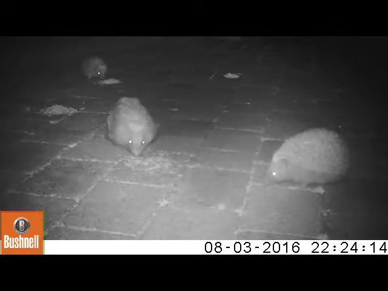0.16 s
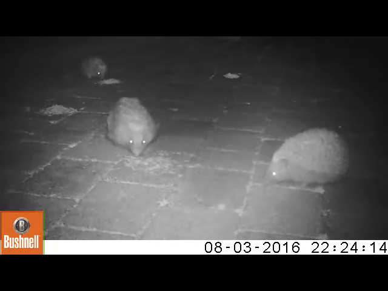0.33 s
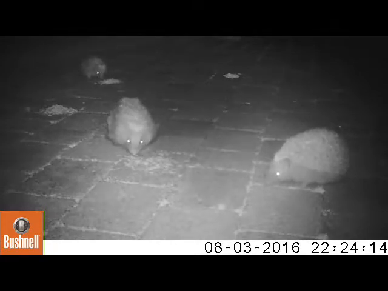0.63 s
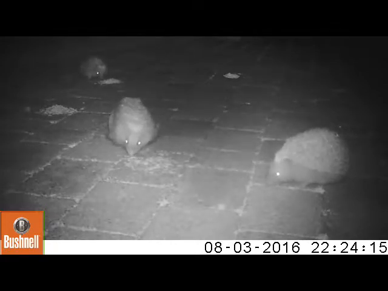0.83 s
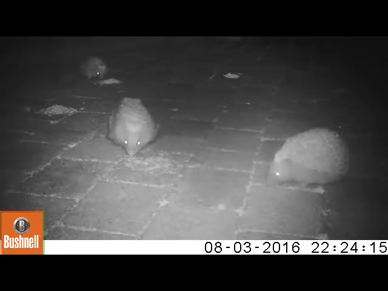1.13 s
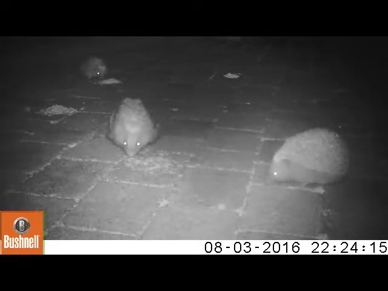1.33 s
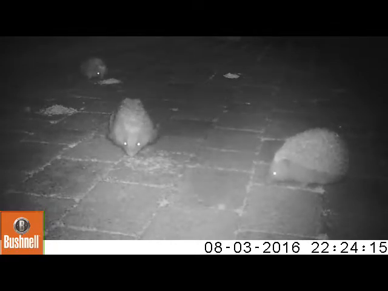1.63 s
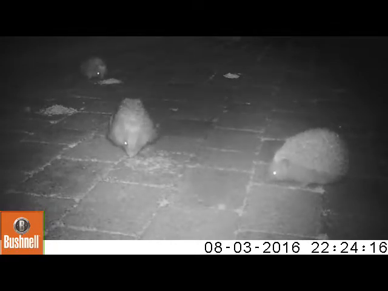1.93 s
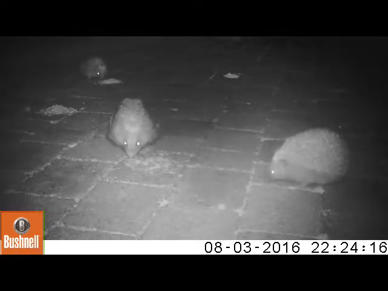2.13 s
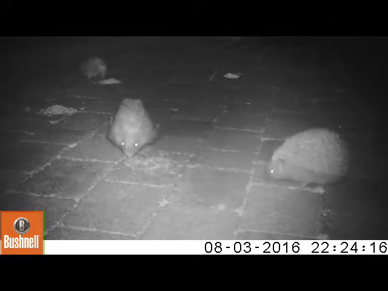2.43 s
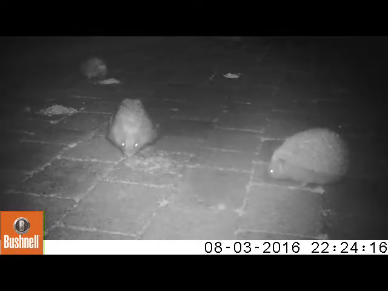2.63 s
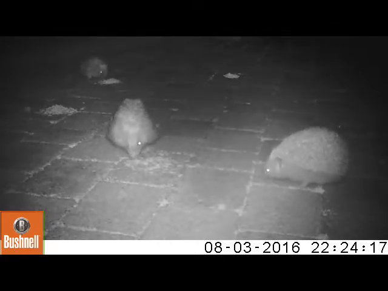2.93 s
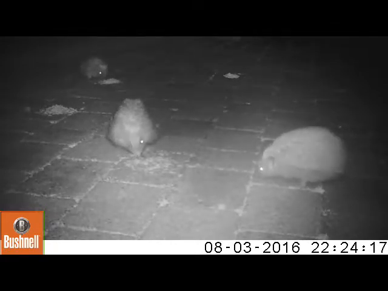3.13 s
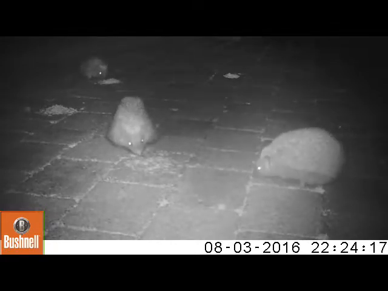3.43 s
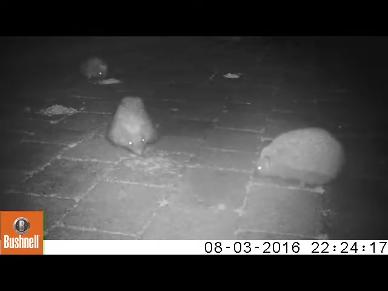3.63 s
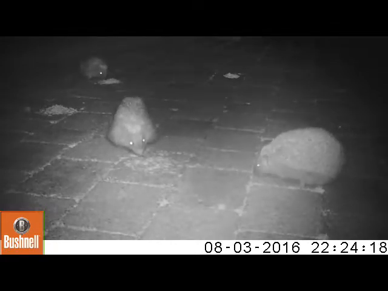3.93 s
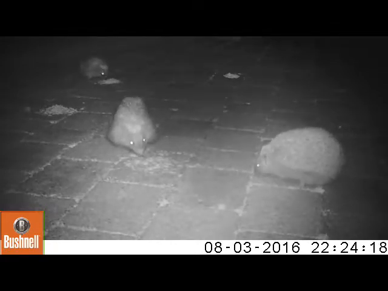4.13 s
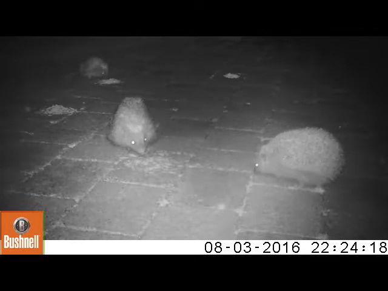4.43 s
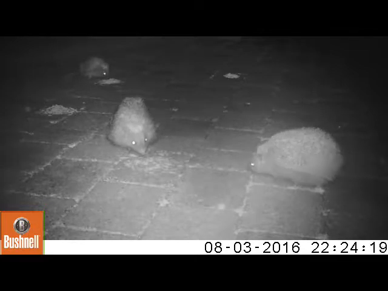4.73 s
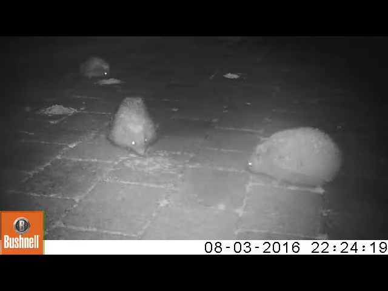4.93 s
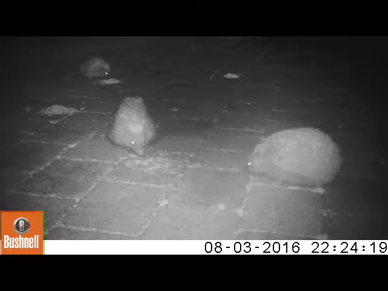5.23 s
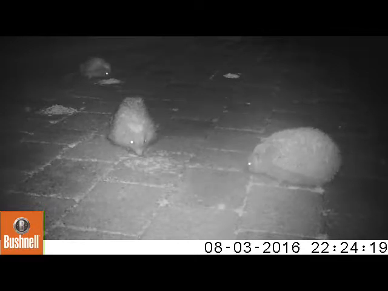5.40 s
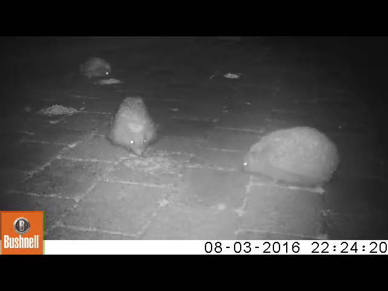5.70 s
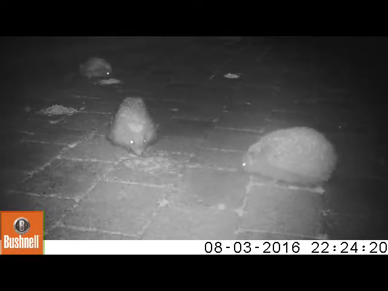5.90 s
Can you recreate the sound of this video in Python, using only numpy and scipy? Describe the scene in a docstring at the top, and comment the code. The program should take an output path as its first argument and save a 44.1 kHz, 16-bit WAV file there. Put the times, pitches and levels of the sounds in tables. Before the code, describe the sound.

Quick crisp crunching of hard dry food by small animals outdoors, with low wind buffeting the microphone and a steady dull rumble.

```python
"""Hedgehogs crunching dry pellets

At night, hedgehogs crunch dry pellets on paving near a boxed outdoor camera.
Brittle fracture: each bite is a shower of tiny breaks with some loud cracks, and these impulsive forces
excite a dull and a bright group of resonances. The paving and nearby walls add a short smear.
Turbulence: light wind buffets the microphone port, as filtered noise and single pressure dips.
A steady rumble and hiss, made as noise of a given spectrum, lies underneath."""
import sys
import numpy as np
from scipy import signal
from scipy.fft import rfft, irfft, next_fast_len
from scipy.io import wavfile
from scipy.ndimage import uniform_filter1d

SR = 44100
rng = np.random.default_rng(int(sys.argv[2]) if len(sys.argv) > 2 else 0)


def bounce(signal):
    """Save signal as a 16-bit WAV file at the path given by the first command-line argument."""
    frames = np.transpose(np.atleast_2d(signal))
    limited = np.clip(frames, -1, 1)
    pcm = np.round(limited * 32767).astype(np.int16)
    wavfile.write(sys.argv[1], SR, pcm)


N = 267246
T = np.arange(N) / SR  # time in seconds


def undb(db):
    """Decibel law: 20 dB is a factor of ten in amplitude."""
    return 10 ** (np.asarray(db) / 20)


def level(x, db):
    """Normalisation: scales a signal to a given rms level in dB."""
    return x * undb(db) / np.sqrt(np.mean(x ** 2))


def random_signs(count):
    """Random polarity: each force pushes or pulls with equal chance."""
    return rng.choice([-1., 1.], count)


def coloured(spectrum):
    """Spectral shaping: white noise weighted by (Hz, relative dB) points, at rms 1."""
    hz, db = np.transpose(spectrum)
    size = next_fast_len(N)
    f = np.maximum(np.fft.rfftfreq(size, 1 / SR), 1)
    gain = undb(np.interp(np.log(f), np.log(hz), db))
    white = rng.standard_normal(size)
    return level(irfft(rfft(white) * gain, size)[:N], 0)


def walk(rate):
    """Slow random modulation: values held for 1 / rate s, smoothed by two moving averages, at rms 1."""
    hold = int(SR / rate)
    steps = np.repeat(rng.standard_normal(N // hold + 1), hold)
    smooth = uniform_filter1d(uniform_filter1d(steps, hold), hold)
    return level(smooth[:N], 0)


NIGHT_LEVEL_DB = -52
# Spectrum of the steady rumble and hiss.
# Each row: frequency in Hz, relative spectral level in dB.
NIGHT_SPECTRUM = [(12, -27), (20, -6), (46, -4), (1740, -41.5), (6100, -46), (10300, -51.5), (13400, -90.5),
                  (22000, -120)]


def night():
    """Stationary noise: a low rumble and hiss whose level wanders very slightly."""
    return coloured(NIGHT_SPECTRUM) * undb(NIGHT_LEVEL_DB + 0.087 * walk(3))


# The strongest eddies that suck at the port.
# Each row: time of the dip in seconds, peak level in dB, pitch in Hz.
EDDIES = [(0.015, -34, 65), (0.128, -33.5, 70), (0.154, -28.5, 86), (0.168, -30, 70), (0.296, -21, 61),
          (0.328, -27.5, 85), (0.396, -24.5, 68), (0.49, -31.5, 59.6), (2.103, -34, 61), (2.153, -31.5, 69),
          (2.247, -32, 55), (2.98, -31.5, 75.5), (3.033, -33.5, 112), (3.128, -31.5, 66),
          (3.275, -31, 56.4), (3.508, -27, 57), (3.926, -26.5, 59.5), (4.018, -26.5, 69), (4.083, -31, 69),
          (4.136, -32.5, 55.3)]


def thumps(cycles=0.4):
    """Suction of a vortex: each strong eddy is a dip in pressure between two small rebounds."""
    out = np.zeros(N)
    for s, db, hz in EDDIES:
        turns = (T - s) * hz
        out -= undb(db) * np.cos(2 * np.pi * turns) * np.exp(-(turns / cycles) ** 2)
    return out


GUST_RISE_S, GUST_FALL_S = 0.032, 0.058  # before and after the held part of a gust
# Gusts at the port.
# Each row: start of the held part in seconds, its length in seconds, level of the slow buffeting in dB,
# level of the quick flutter in dB, both before the random lumps; a level below the calm one has no effect.
GUST_TABLE = [(0.0, 0.079, -34, -78), (0.108, 0.12, -36, -45.5), (0.271, 0.14, -33, -40),
              (0.432, 0.1, -38, -47.5), (1.035, 0.17, -36, -71), (1.702, 0.27, -35, -53.5),
              (2.065, 0.34, -37.5, -49.5), (2.58, 0.15, -36, -51), (2.92, 0.33, -37.5, -48.5),
              (3.344, 0.32, -36.5, -54.5), (3.885, 0.327, -36, -49), (4.69, 0.12, -46.5, -58),
              (5.244, 0.12, -43.5, -66), (5.48, 0.24, -46.5, -54), (5.95, 0.15, -45, -59.5)]


def gusting(column, calm_db):
    """Envelope of unsteady flow: a gust louder than the calm level lifts it by a rise, a hold and a fall."""
    out = np.full(N, float(calm_db))
    for gust in GUST_TABLE:
        start_s, length_s = gust[:2]
        rise = (T - start_s) / GUST_RISE_S + 1
        fall = (start_s + length_s - T) / GUST_FALL_S + 1
        share = np.clip(np.minimum(rise, fall), 0, 1)
        # a quieter gust leaves the level unchanged
        out = np.maximum(out, calm_db + share * (gust[column] - calm_db))
    return out


def wind():
    """Turbulent pressure: slow buffeting, quicker flutter and rasp swell in the same lumps."""
    # the second argument is the level in dB between gusts
    buffet_db = gusting(2, -49.5)
    flutter_db = gusting(3, -67.5)
    buffet = coloured([(2, -22.5), (8, 8), (28, 0.5), (45, -19.0), (120, -42.5), (20000, -140)])
    flutter = coloured([(2, -57.5), (30, -18.5), (50, 4.5), (100, -11.5), (170, -14), (300, -35.5),
                        (20000, -140)])
    # the strongest gusts tear into finer eddies that reach higher
    rasp = coloured([(2, -61), (90, -14.5), (140, -4.0), (250, -7), (420, -25.5), (20000, -140)])
    rasp_db = 1.545 * flutter_db + 7.0
    swell = buffet * undb(buffet_db) + flutter * undb(flutter_db) + rasp * undb(rasp_db)
    lumps_db = 2.2 * walk(18)
    return swell * undb(lumps_db) + thumps()


def ring(x, hz, width_hz):
    """Resonance: the same band-pass twice in series gives one peak with steep skirts."""
    b, a = signal.iirpeak(hz, hz / width_hz, fs=SR)
    return signal.lfilter(b, a, signal.lfilter(b, a, x))


def fractures(rate, spread_db):
    """Random point process: breaks at a mean rate per second, most small and a few large, at rms 1."""
    breaks = rng.random(N) < rate / SR
    size = np.minimum(rng.exponential(1, N), 3.0)
    return level(breaks * undb(spread_db * size), 0)


def favour(hz, centre_hz, octaves):
    """Cavity tuning: the mouth's opening favours resonances near one centre."""
    return 0.13 + 0.69 * np.exp(-.5 * (np.log2(hz / centre_hz) / octaves) ** 2)


RISE_SHARE, EDGE_DB = 0.49, 12.5  # part of a bite spent building up; fall in level at its edges
# Jaw closings.
# Each row: time of greatest pressure in seconds, length in ms, relative levels of the dull and the bright
# crumbling in dB, centres favoured in the dull and the bright group in Hz.
JAW_CLOSINGS = [(0.093, 44, -51, -50.5, 3540, 6200), (0.176, 44, -50, -46, 4060, 6200),
                (0.293, 40, -40, -46, 3630, 5100), (0.418, 18, -62, -58.5, 3630, 4780),
                (0.47, 13, -55, -68, 3650, 5140), (0.539, 59, -48.5, -54.5, 3700, 5400),
                (0.645, 25, -58, -43, 4160, 5460), (0.676, 33, -58, -50, 4050, 6000),
                (0.733, 30, -62, -65, 3800, 5880), (0.812, 79, -54, -61, 3630, 5580),
                (0.93, 100, -69, -55.5, 3510, 5630), (1.097, 70, -57, -55.5, 3580, 5930),
                (1.135, 95, -58, -61, 3590, 5800), (1.237, 33, -74, -58, 3030, 5650),
                (1.339, 47, -49, -57, 3360, 5520), (1.435, 22, -57, -59, 3740, 4790),
                (1.556, 70, -51, -54, 3540, 6100), (1.592, 25, -60, -54, 3320, 6200),
                (1.767, 35, -50, -48, 3600, 6560), (1.802, 70, -48.5, -50.5, 3300, 6050),
                (1.98, 13, -50, -63, 3720, 4830), (2.021, 62, -47.5, -51.5, 3480, 5050),
                (2.149, 38, -64, -55, 3600, 5670), (2.252, 59, -51, -53.5, 3460, 5460),
                (2.486, 49, -61, -58, 3530, 6750), (2.753, 32, -53, -46, 3270, 5420),
                (2.78, 43, -53.5, -51, 3340, 6020), (3.014, 80, -46, -51, 3530, 6450),
                (3.125, 19, -62, -61, 3500, 5700), (3.238, 47, -44.5, -50.5, 3200, 6160),
                (3.265, 37, -51.5, -53, 2600, 6100), (3.368, 150, -58, -56.5, 3800, 6000),
                (3.518, 70, -49, -53, 3260, 6300), (3.558, 29, -58, -55, 2590, 6330),
                (3.772, 51, -50.5, -56.5, 3170, 6150), (3.951, 19, -70, -57, 3200, 5430),
                (4.043, 50, -53, -57, 3380, 6180), (4.237, 15, -52, -55.5, 3670, 5220),
                (4.305, 19, -70, -59, 4090, 5650), (4.355, 34, -64, -62, 3380, 5800),
                (4.638, 37, -62, -55.5, 3230, 6000), (4.845, 30, -60, -66, 3600, 5850),
                (4.908, 54, -54, -53.5, 3600, 5830), (4.941, 42, -56, -63, 3660, 5940),
                (5.113, 16, -57, -63, 3120, 5740), (5.268, 60, -56, -58.5, 3080, 6280),
                (5.528, 54, -56, -55, 3350, 6200), (5.719, 67, -56.5, -52, 3380, 5350),
                (5.816, 40, -53, -55, 3530, 6600)]


def pressure(db, centre_hz, hz, octaves):
    """Power summation: the jaw pressure of all bites, each building to a peak and letting go."""
    power = np.zeros(N)
    for k, (s, length_ms) in enumerate(np.array(JAW_CLOSINGS)[:, :2]):
        near = slice(max(int((s - .15) * SR), 0), int((s + .15) * SR))
        t = T[near] - s
        # distance from the peak: 1 at either edge of the bite
        past = 1000 * np.where(t < 0, -t / RISE_SHARE, t / (1 - RISE_SHARE)) / length_ms
        bite = undb(db[k] - EDGE_DB * past) * favour(hz, centre_hz[k], octaves)
        power[near] += bite ** 2
    return np.sqrt(power)


DEBRIS_MS = 4.4  # decay time constant of the crumbs that keep breaking off after each crack
# The loudest single pellets splitting.
# Each row: time in seconds, relative levels in the dull and the bright group in dB.
PELLET_CRACKS = [(0.0914, -42, -43), (0.1062, -49, -43), (0.163, -48, -42), (0.2816, -31, -34),
                 (0.296, -36, -39), (0.524, -37, -42), (0.5443, -41, -56), (0.637, -54, -32),
                 (0.6669, -58, -35), (0.7263, -34, -52), (0.8263, -43, -56), (0.9306, -62, -46),
                 (1.2312, -65, -44), (1.338, -34, -48), (1.556, -41, -40), (1.588, -33, -35),
                 (1.7547, -42, -41), (1.7652, -38, -42), (1.791, -38, -28.5), (1.811, -48, -44),
                 (1.9987, -40, -60), (2.007, -35, -33), (2.0213, -40, -50), (2.1507, -68, -45),
                 (2.25, -42, -51), (2.7226, -58, -38), (2.7485, -33, -33), (2.771, -48, -39),
                 (2.9736, -54, -36.5), (3.005, -38, -29.5), (3.017, -44, -33.5), (3.03, -39, -42),
                 (3.231, -35, -32), (3.2646, -57, -42), (3.5201, -40, -37), (3.556, -41, -43),
                 (3.776, -54, -38), (4.2353, -52, -52), (4.6401, -64, -39), (4.8447, -65, -40.5),
                 (4.9436, -48, -38), (5.2674, -43, -50), (5.5246, -58, -46), (5.712, -52, -43),
                 (5.808, -40, -33.5)]


def resound(modes, shower, splinters, column, octaves, splinter_db, debris_db, tear_ms):
    """Modal excitation: crumbling, splinters and cracks drive one group of resonances."""
    bite_s, bite_db, bite_hz = np.array(JAW_CLOSINGS)[:, [0, 2 + column, 4 + column]].T
    crack_s, crack_db = np.array(PELLET_CRACKS)[:, [0, 1 + column]].T
    # a crack takes the mouth shape of the nearest bite
    crack_hz = bite_hz[np.argmin(abs(crack_s[:, None] - bite_s), axis=1)]
    at = (crack_s * SR).astype(int)
    crack_sign = random_signs(len(at))
    debris_decay = np.exp(-1000 / (DEBRIS_MS * SR))
    out = 0
    for hz, width_hz, db in modes:
        # a crack is a short tearing push, not a single instant
        t = T[:200]
        tear = np.sin(2 * np.pi * hz * t) * np.exp(-1000 * t / tear_ms)
        # no two mouthfuls ring this resonance equally
        uneven_db = bite_db + 2.0 * rng.standard_normal(len(bite_db))
        jaw = pressure(uneven_db, bite_hz, hz, octaves)
        cracks = np.zeros(N)
        cracks[at] = crack_sign * undb(crack_db) * favour(hz, crack_hz, octaves)
        debris = undb(debris_db) * signal.lfilter([1], [1, -debris_decay], abs(cracks))
        crumbling = random_signs(N) * (jaw + debris) * shower
        starts = cracks + undb(splinter_db) * jaw * splinters
        force = crumbling + signal.fftconvolve(starts, tear)[:N]
        out = out + undb(db) * ring(force, hz, width_hz)
    return out


# The two groups of resonances that the fractures ring.
# Each row: frequency in Hz, width of each of the two band-pass stages in Hz, relative level in dB.
DULL_MODES = [(2410, 1000, 1), (2760, 660, -0.5), (3234, 460, -1.5), (3570, 590, 0.5), (3836, 340, -8)]
BRIGHT_MODES = [(4970, 900, 0.5), (5410, 1300, -7.5), (5890, 1260, -2), (6304, 880, -5), (7360, 710, -1),
                (8100, 360, 2), (9130, 1400, -8.5), (9620, 1700, -2.5)]


def chewing():
    """Common excitation: both groups share the same breaks, then reflections smear the sum."""
    shower = fractures(900, 2.86)
    # larger, rarer breaks at random, weighted by the jaw pressure
    splinters = random_signs(N) * fractures(220, 3.8)
    dull = resound(DULL_MODES, shower, splinters, column=0, octaves=0.13,
                   splinter_db=-18.5, debris_db=-15, tear_ms=0.38)
    bright = resound(BRIGHT_MODES, shower, splinters, column=1, octaves=0.26,
                     splinter_db=-13.5, debris_db=-19, tear_ms=0.18)
    near = dull + bright
    # the paving and nearby walls return a short smear that falls 60 dB in 55 ms
    t = np.arange(int(.08 * SR)) / SR
    smear = rng.standard_normal(len(t)) * undb(-60 * t / 0.055) * (t > .001)
    smear /= np.linalg.norm(smear)
    return near + undb(-6) * signal.fftconvolve(near, smear)[:N]


def scene():
    """Superposition: the pressures of night, wind and chewing add."""
    return (night() + wind() + chewing())[None]


FADE_IN_S, TOP_HZ = 0.008, 10380


def record(dry):
    """Band limiting: the camera cuts the top steeply."""
    # a short linear fade-in keeps the sound from starting with a click
    faded = dry * np.minimum(T / FADE_IN_S, 1)
    low_pass = signal.ellip(10, .2, 60, TOP_HZ, fs=SR, output="sos")
    return signal.sosfilt(low_pass, faded)


dry = scene()
out = record(dry)
bounce(out)
```